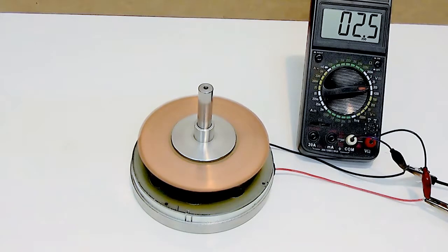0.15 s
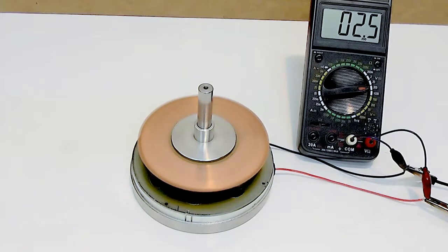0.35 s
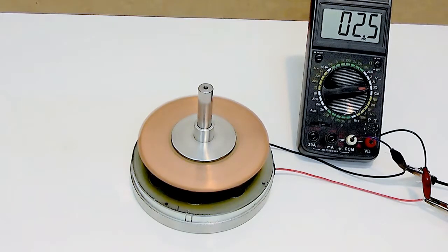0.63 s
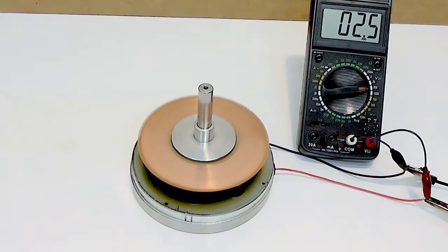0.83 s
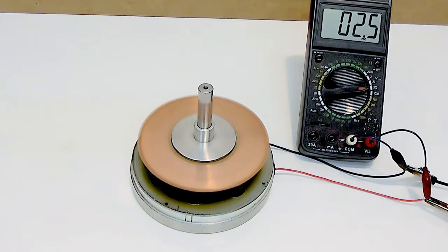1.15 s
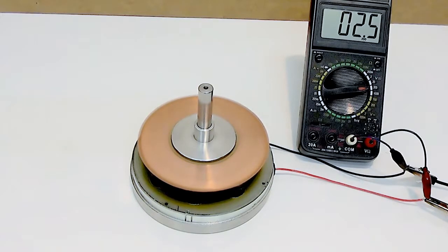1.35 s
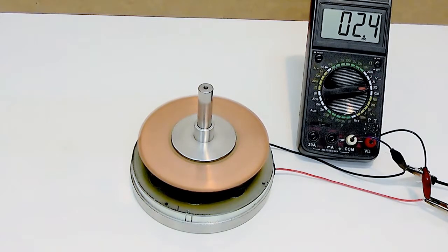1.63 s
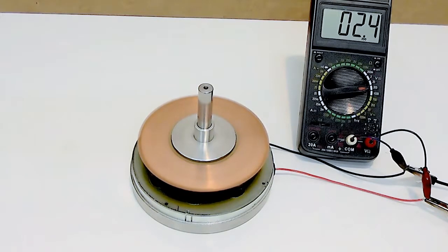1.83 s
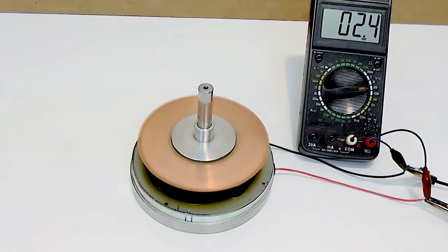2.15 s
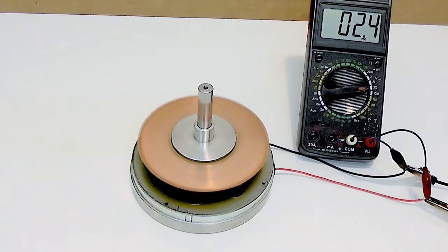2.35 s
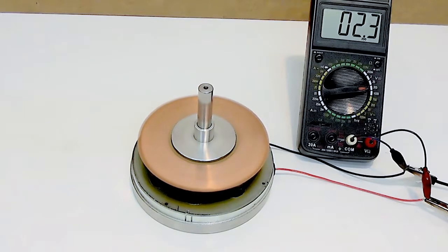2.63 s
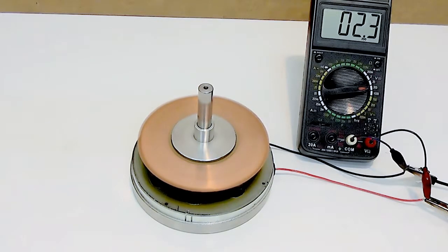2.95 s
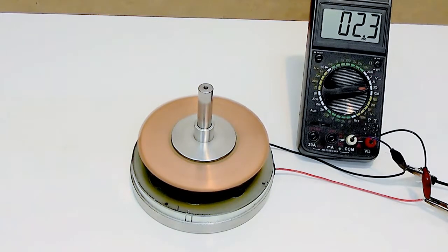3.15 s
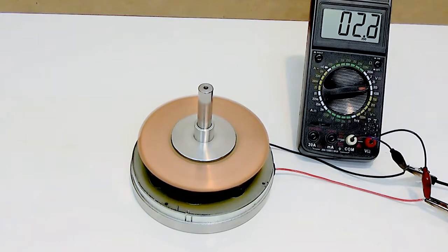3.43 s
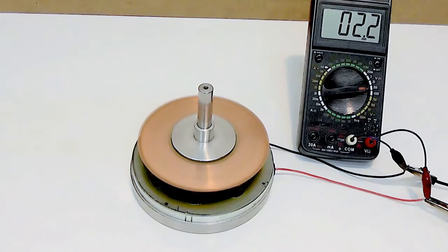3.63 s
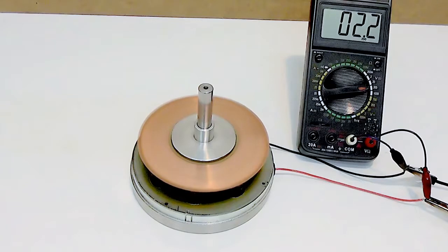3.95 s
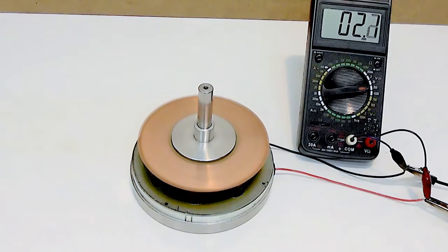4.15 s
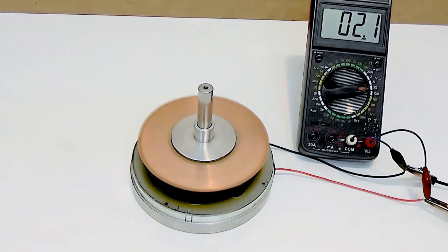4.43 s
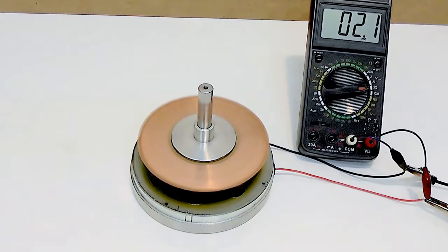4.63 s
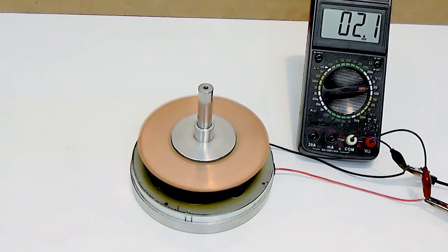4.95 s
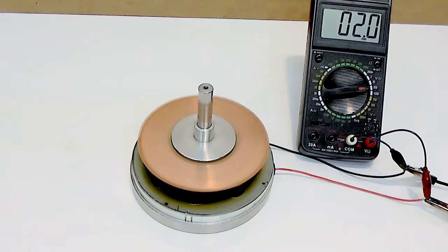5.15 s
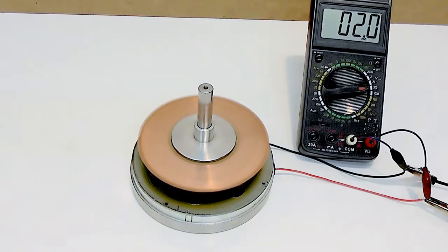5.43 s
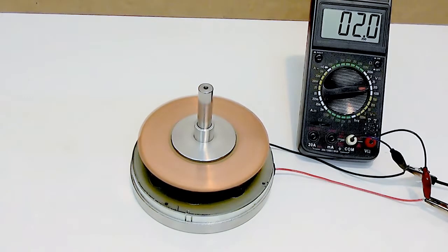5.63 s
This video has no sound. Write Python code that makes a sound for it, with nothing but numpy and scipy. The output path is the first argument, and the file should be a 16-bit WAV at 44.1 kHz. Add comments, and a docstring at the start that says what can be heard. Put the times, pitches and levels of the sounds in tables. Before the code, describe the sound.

Continuous metallic scraping with a rough, fluttering whir dominates from start to finish, its pitch and level easing down steadily as the disc loses speed. A soft low hum and bearing rumble resonate in the table, with one barely noticeable dull thump early on. Close pickup, short faint echo, quiet room air underneath.

```python
"""From the start a metal disc on a homemade motor coasts down on a table. A sliding contact scrapes over fine
tool marks on the rim: a rasp read from a rim map returns every turn, slowly changing, and rings the disc.
The out-of-round shaft hums in the table top, made from multiples of the turn rate over a bearing rumble.
About two seconds in there is one soft low thud, a decaying sine. Rasp and hum sink in pitch and level to the
end. Underneath throughout lies a quiet room: shaped noise, a few faint steady tones and a short echo."""
import sys
import numpy as np
from scipy import signal
from scipy.fft import rfft, irfft, next_fast_len
from scipy.io import wavfile
from scipy.ndimage import map_coordinates

SR = 44100
rng = np.random.default_rng(int(sys.argv[2]) if len(sys.argv) > 2 else 0)


def pcm_store(signal):
    """Save signal as 16-bit PCM."""
    levels = np.round(np.clip(np.atleast_2d(signal), -1, 1) * 32767)
    wavfile.write(sys.argv[1], SR, levels.astype(np.int16).T)


N = 255339  # length in samples

# shaft speed as it coasts down: time_s, speed_turns_per_s
SHAFT_SPEED = [(0.0, 18.1406), (0.725, 17.4145), (1.45, 16.7567), (2.175, 16.1883), (2.9, 15.5147),
               (3.625, 14.8566), (4.35, 13.9996), (5.075, 13.0208), (5.8, 12.035)]
# overtones of the tool-mark rate, from the first up: relative_level_db
MARK_OVERTONES = [2.27, 7.2, 6.85, 5.7, 2.8, 1.9, 1.3, 4, 8.3]
# spectrum of the grit between the marks: bumps_per_turn, relative_level_db
GRIT_SPECTRUM = [(60, -16), (105, -11), (135, -2), (178, -1.5), (215, -5.5), (260, 2), (350, -2.5),
                 (640, -2.5), (900, -3.5), (1300, -6.5), (2000, -7)]
# resonances of disc and base, before the valleys are deepened: pitch_hz, width_hz, level_db
DISC_MODES = [(2010, 232, 6), (3197, 148, 9), (3846, 850, 0.5), (4502, 750, 4.5), (5270, 590, -1),
              (5810, 396, 7.5), (6280, 337, 8), (7240, 570, 5.5), (8390, 300, 6), (9466, 660, 7),
              (10160, 1640, 1.5), (12900, 470, -2.5), (13270, 960, -4), (14600, 760, -11),
              (15900, 900, -11)]
# shaft shake at each multiple of the turn rate, from the fifth up: relative_level_db
SHAFT_SHAKE = [0, 4, 4, -2, 0, 7, 4, -0.5, 3, -0.5, -2, -1.5, -3.5, -0.5, -4, -5, -3.5]
# resonances of the table top: pitch_hz, width_hz, level_db
TABLE_MODES = [(110.4, 7.6, -7), (150.4, 11, -6.5), (167.3, 9.2, -2.5), (197.3, 12.2, 1), (223, 23, -3),
               (291, 98, -11)]
# rough spots round the rim: place_turns, half_width_turns, level_db, overtone_brought_out_most
ROUGH_SPOTS = [(0.111, 0.041, 8.5, 5.03), (.177, 0.073, 5.5, 6), (0.214, 0.049, 6, 0.87),
               (0.324, .024, 13, 0.66), (.326, 0.031, 9, 17.4), (.374, 0.14, -1, 1.48),
               (.404, 0.029, 11.5, 10.1), (0.575, 0.029, 4.5, 1.06), (0.621, 0.033, 5.5, 5.3),
               (0.7, .021, -7, 0.76), (.761, 0.12, 4.3, 1.2), (0.766, 0.055, 8.5, 6.74)]
# decay of the room's echo: pitch_hz, t60_s
WALL_DECAY = [(200, 0.43), (2000, 0.19), (5000, 0.017), (10000, 0.11)]
# spectrum of the room air: pitch_hz, relative_density_db
AIR_SPECTRUM = [(12, -50), (25, -22), (55, 0.5), (120, -17), (250, -9.5), (400, 1.5), (650, -2), (920, -8),
                (1100, -5), (1230, -12.5), (1500, -5.5), (2000, -12.5), (3300, -120)]
# left-right correlation of the room air: pitch_hz, correlation
AIR_CORRELATION = [(25, .3), (60, 0.31), (150, 0.2), (500, 0.22), (1200, 0.67)]
# steady tones in the room, about which each level wavers: pitch_hz, level_db
ROOM_TONES = [(349.9, -63), (764.4, -74), (829.0, -72.5), (1082, -71.5), (1147, -72.5), (1270, -70.5)]

START_TURN = .4543  # shaft angle at the start, turns
MARKS = 142  # tool marks a turn
RIM_POINTS = 4096  # points round the rim map
SCRAPE_DB, SPEED_POWER = -28, 1.21  # scrape gain at the start; its power of the speed ratio
SMOOTH_DB, REACH_OCTAVES = -12.5, 1.26  # rim between the spots; reach of a spot to other overtones
HUM_DB, HUM_POWER = -49.5, 0.5  # hum gain at the start; its power of the speed ratio
WALLS_DB = -16  # echo gain
TOP_HZ = 15830  # band limit


def rasp(grit_db=-1.21, memory_turns=12, fresh=0.59):
    """Forced vibration: the contact reads the rim's relief as a force, and the disc's resonances answer it."""
    place = np.arange(RIM_POINTS) / RIM_POINTS
    wear = [worn(place, overtone) for overtone in (1, 2, 3.5, 7)]  # four sizes of roughness
    marks = tool_marks(place, wear, memory_turns)
    grit = rim_grit(wear, memory_turns, fresh)
    rim = unit(marks) + amp(grit_db) * unit(grit)
    turn = shaft_turns()
    force = map_coordinates(rim, [turn, turn % 1 * RIM_POINTS], mode="grid-wrap")
    press = amp(SCRAPE_DB) * speed_ratio() ** SPEED_POWER
    return filtered(press * force, modes(DISC_MODES, steep=1.5))


def tool_marks(place, wear, memory_turns, patch_db=4.0, slip_rad=1.66):
    """Fourier series of a periodic relief; uneven spacing acts as phase modulation."""
    def patch(width, turns):
        """Gaussian low-pass: a smooth random pattern round the rim."""
        return track(turns, .1, lambda order: np.exp(-(order / width) ** 2))

    marks = 0
    for k, db in enumerate(MARK_OVERTONES):
        group = [0, 1, 2, 2, 3, 3, 3, 3, 3][k]
        # uneven spacing blurs the finer overtones more, and they change sooner from turn to turn
        wander = slip_rad * (1 + .17 * k) * patch(10, 40 / (k + 1) + 8)
        depth = amp(db + patch_db * patch(16, memory_turns)) * wear[group]
        marks = marks + depth * np.cos(2 * np.pi * (k + 1) * MARKS * place + wander)
    return marks


def rim_grit(wear, memory_turns, fresh, even=0.72):
    """Band splitting: random relief is divided into four sizes, each weighted by its own wear."""
    bumps = rfft(track(memory_turns, fresh, lambda order: amp(along(GRIT_SPECTRUM, order))))
    size = np.digitize(np.arange(bumps.shape[1]) / MARKS, [1.17, 2.5, 4.5])
    # an exponent below one lays grit more evenly round the rim than the marks
    return sum(rough ** even * irfft(bumps * (size == g)) for g, rough in enumerate(wear))


def worn(place, overtone):
    """Superposition: roughness for one size of mark is a smooth base plus every rough spot."""
    rough = amp(SMOOTH_DB)
    for at, width, db, best in ROUGH_SPOTS:
        distance = (place - at + .5) % 1 - .5  # the shorter way round
        octaves = np.log2(overtone / best)
        rough = rough + amp(db) * np.exp(-(distance / width) ** 2 - (octaves / REACH_OCTAVES) ** 2)
    return rough


def track(memory_turns, fresh, shape):
    """Autoregression: a random rim map, a row a turn, lasts some turns while a share is new each turn."""
    noise = rng.standard_normal((130, RIM_POINTS))
    # the first 30 rows only settle the recursion
    old = signal.lfilter([1], [1, -np.exp(-1 / memory_turns)], noise, axis=0)[-100:]
    bumps = unit(old) + fresh * rng.standard_normal(old.shape)
    return unit(irfft(rfft(bumps) * shape(np.arange(RIM_POINTS // 2 + 1)), RIM_POINTS))


def hum(rumble_db=-3):
    """Harmonic excitation: multiples of the turn rate shake the table top, over the bearing's rumble."""
    turn = shaft_turns()
    shake = 0
    for k, db in enumerate(SHAFT_SHAKE, 5):
        # level and phase of each multiple waver a little
        waver = amp(2 * wobble(2.5)) * np.exp(.35j * wobble(5) + 2j * np.pi * rng.random())
        shake = shake + amp(db) * np.real(waver * np.exp(2j * np.pi * k * turn))
    rumble = unit(filtered(rng.standard_normal(N), lambda hz: (hz < 450) * modes(TABLE_MODES)(hz)))
    fade = speed_ratio() ** HUM_POWER
    return amp(HUM_DB) * fade * (filtered(shake, modes(TABLE_MODES)) + amp(rumble_db) * rumble)


def shaft_turns():
    """Kinematics: shaft angle in turns is the integral of its speed."""
    return START_TURN + np.cumsum(curve(SHAFT_SPEED)) / SR


def speed_ratio():
    """Normalisation: shaft speed as a share of its starting speed."""
    return curve(SHAFT_SPEED) / SHAFT_SPEED[0][1]


def thud(start_s=2.06, pitch_hz=72, level_db=-48, rise_s=0.041, t60_s=0.94):
    """Damped oscillation: one soft, low sine with a gradual onset and exponential decay."""
    t = np.clip(np.arange(N) / SR - start_s, 0, None)
    envelope = amp(level_db - 60 * t / t60_s) * (1 - np.exp(-t / rise_s))
    return envelope * np.sin(2 * np.pi * pitch_hz * t)


def walls(x):
    """Reverberation: convolution with stereo noise whose every frequency dies at its own speed."""
    hz, t, z = signal.stft(rng.standard_normal((2, SR // 2)), SR, nperseg=256)
    decay = amp(-60 * t / along(WALL_DECAY, hz)[:, None])
    tail = signal.istft(z * decay, SR, nperseg=256)[1]
    delayed = np.pad(x, (300, 0))[None]  # samples of delay before the echo
    return signal.fftconvolve(delayed, tail / np.linalg.norm(tail[0]), axes=1)[:, :N]


def air(level_db=-55):
    """Partial coherence: mid and side noise set how alike the ears are at each frequency."""
    def mid_side(hz):
        """Energy split: half the arccosine of the correlation divides mid from side."""
        split = np.arccos(np.clip(along(AIR_CORRELATION, hz), -1, 1)) / 2
        return amp(along(AIR_SPECTRUM, hz)) * [np.cos(split), np.sin(split)]

    mid, side = filtered(rng.standard_normal((2, N)), mid_side)
    return amp(level_db) * unit(np.array([mid + side, mid - side]))


def room_tones():
    """Narrow-band tones: steady sines whose level and phase waver slightly."""
    t = np.arange(N) / SR
    return sum(amp(db + 3 * wobble(4)) * np.sin(2 * np.pi * hz * t + 2 * wobble(5)) for hz, db in ROOM_TONES)


def modes(table, steep=1):
    """Modal summation: resonances add in power, with minimum phase; steep deepens the valleys."""
    def response(f):
        """Resonance and causality: the power curve fixes the least-delay phase."""
        power = 0
        for centre, width, db in table:
            damping = (f * width) ** 2
            power = power + amp(2 * db) * damping / ((centre * centre - f * f) ** 2 + damping)
        power = power ** steep
        cepstrum = irfft(np.log(power + 1e-12) / 2)
        cepstrum[1:len(f) - 1] *= 2  # folding the cepstrum gives the least delay
        cepstrum[len(f):] = 0
        return np.exp(rfft(cepstrum))
    return response


def filtered(x, response):
    """Linear filtering: the spectrum of x times a response of frequency."""
    m = next_fast_len(N + SR // 2)
    return irfft(rfft(x, m) * response(np.fft.rfftfreq(m, 1 / SR)), m)[..., :N]


def wobble(rate):
    """Slow random modulation: a smooth curve through rate random knots a second."""
    return map_coordinates(rng.standard_normal(400), [np.arange(N) * rate / SR], mode="grid-wrap")


def curve(rows):
    """Linear interpolation: (time_s, value) rows become one value per sample."""
    return np.interp(np.arange(N) / SR, *np.transpose(rows))


def along(points, hz):
    """Logarithmic interpolation: (frequency, value) points read on a log axis."""
    f, v = np.transpose(points)
    return np.interp(np.log(hz + 1), np.log(f + 1), v)


def amp(db):
    """Decibel law: amplitude gain of a level."""
    return 10 ** (np.asarray(db) / 20)


def unit(x):
    """Normalisation: x scaled to rms 1."""
    return x / np.sqrt(np.mean(np.abs(x) ** 2) + 1e-20)


def scene():
    """Superposition: direct sound near the middle, its echo and the room round it."""
    direct = rasp() + hum() + thud()
    left_right = amp([[-.1], [.1]])
    return direct * left_right + amp(WALLS_DB) * walls(direct) + air() + room_tones()


def record(dry):
    """Band limitation: nothing is kept from TOP_HZ upward."""
    return filtered(dry, lambda hz: hz < TOP_HZ)


dry = scene()
out = record(dry)
pcm_store(out)
```